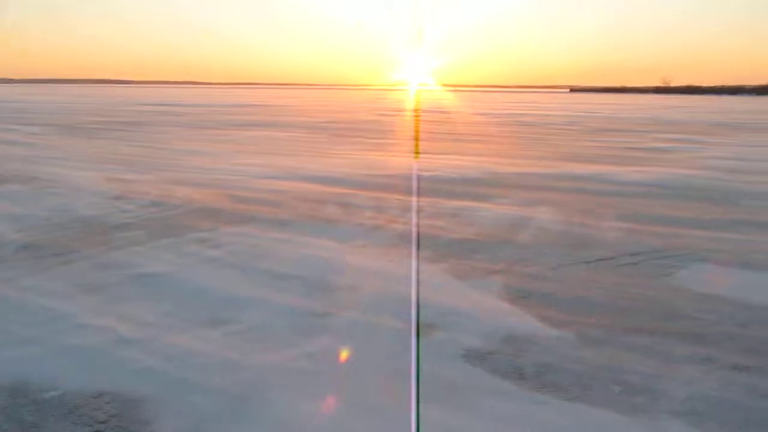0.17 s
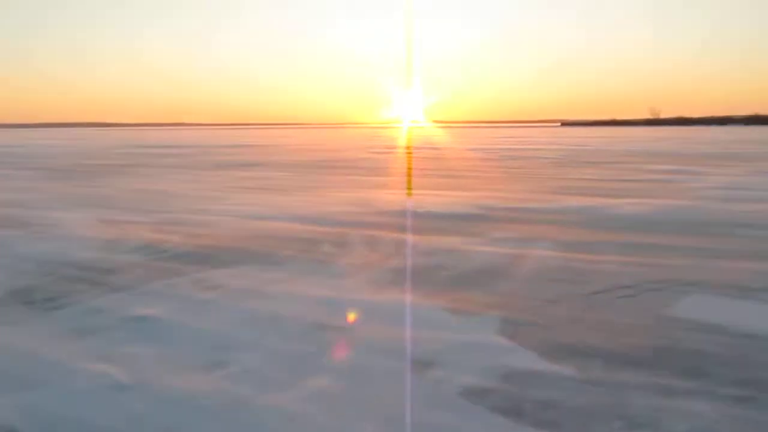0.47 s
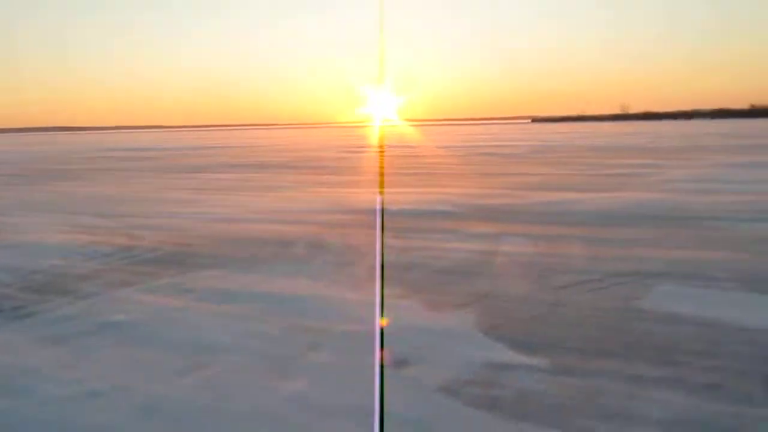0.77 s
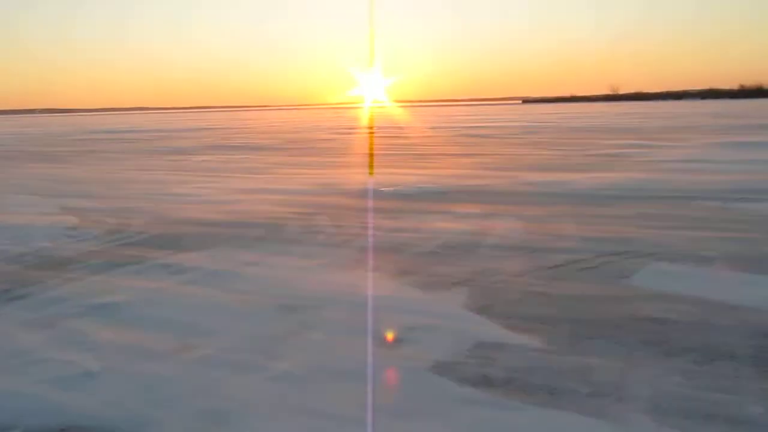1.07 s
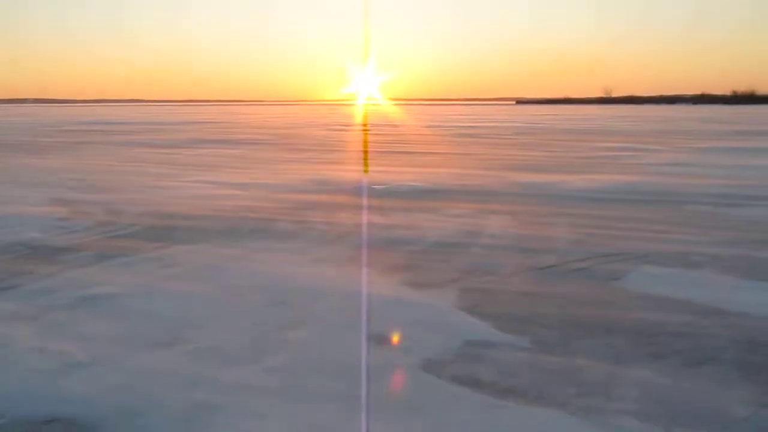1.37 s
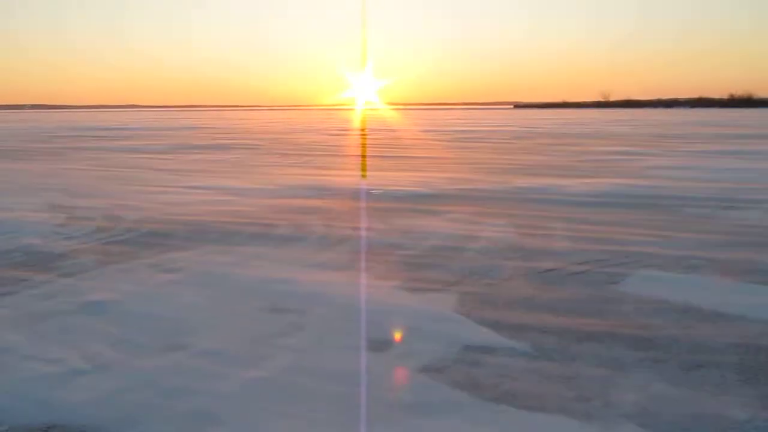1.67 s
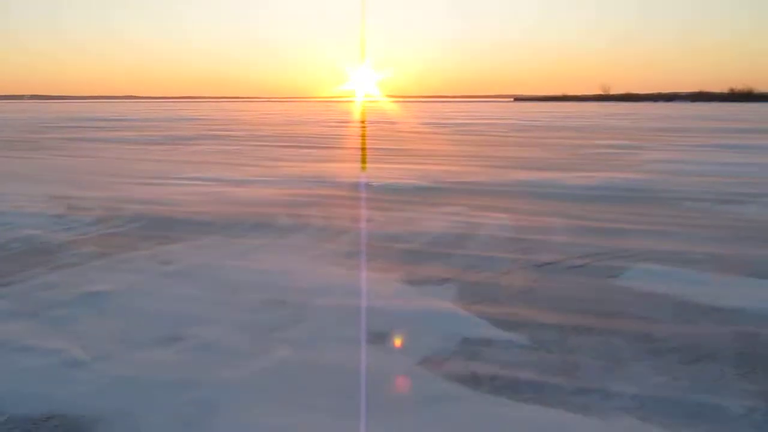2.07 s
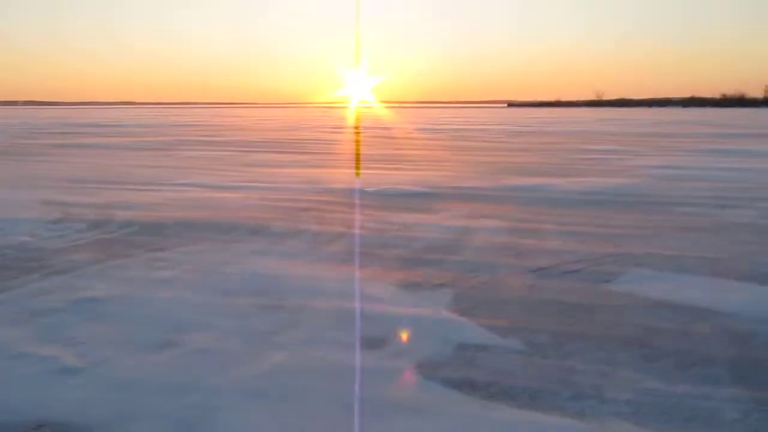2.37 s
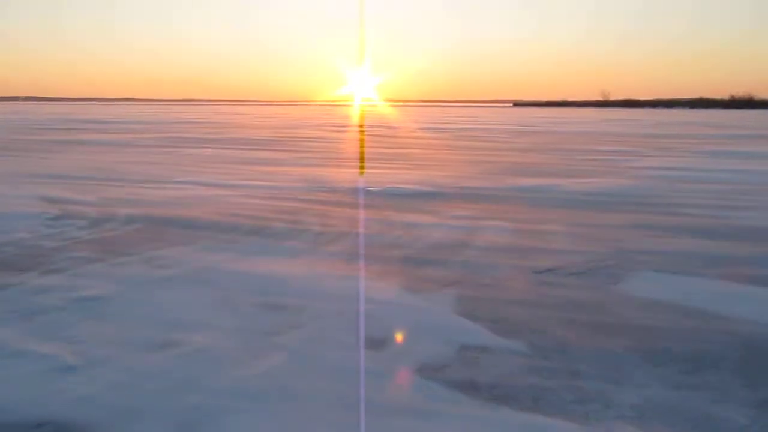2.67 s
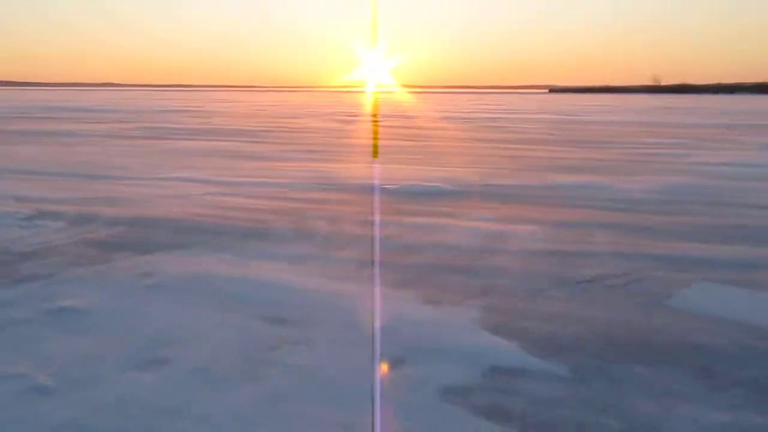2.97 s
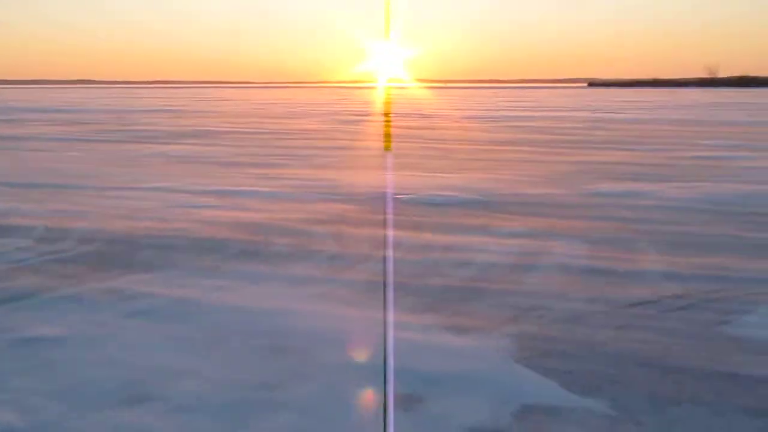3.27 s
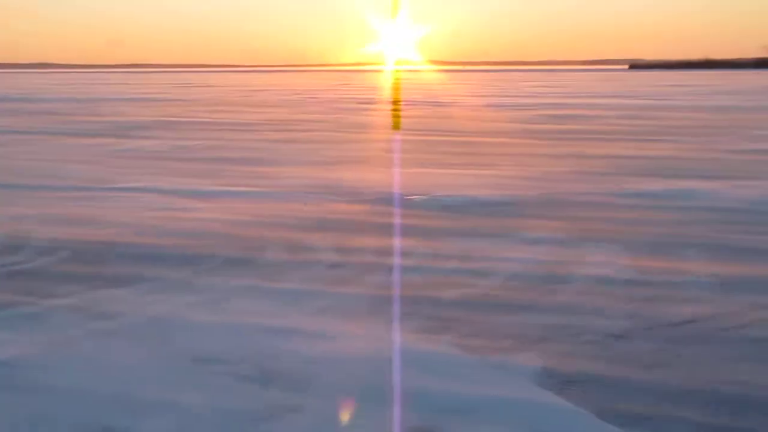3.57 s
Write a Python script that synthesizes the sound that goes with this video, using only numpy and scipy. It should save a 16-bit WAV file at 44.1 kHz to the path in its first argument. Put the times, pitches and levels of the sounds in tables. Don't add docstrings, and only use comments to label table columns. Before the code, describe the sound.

Wind buffeting a small microphone in rough, thudding, distorted gusts over a thin snowy hiss.

```python
import sys
import numpy as np
from scipy import signal
from scipy.fft import rfft, irfft
from scipy.io import wavfile
from scipy.ndimage import uniform_filter1d, minimum_filter1d

SR = 44100
rng = np.random.default_rng(int(sys.argv[2]) if len(sys.argv) > 2 else 0)


def waveform_to_disk(signal):
    frames = np.transpose(np.atleast_2d(signal))
    scaled = np.clip(frames, -1, 1) * 32767
    samples = np.round(scaled).astype(np.int16)
    wavfile.write(sys.argv[1], SR, samples)


def linear_from_db(decibels):
    return 10 ** (np.asarray(decibels, float) / 20)


N = 164493
TIME = np.arange(N) / SR
START_S = .0725

# time_s, level_db, speed_octaves, heave_db
BREEZE = [(0, -36, -0.05, -20), (.3, -28.5, -0.35, -36.5), (.6, -28.5, -0.35, -28.5),
          (.93, -31, -0.65, -34), (.98, -36, 0.07, -48), (1.17, -32, -0.15, -43), (1.45, -27.5, -0.1, -41),
          (1.85, -30.5, -0.15, -35), (2.3, -29.5, -0.05, -44.5), (2.6, -31, -0.25, -39),
          (2.8, -27, 0.25, -51), (3.0, -33, 0.25, -39), (3.2, -29.5, .25, -51), (3.73, -34.5, -0.1, -48)]


def evened(x):
    return x / np.sqrt(np.mean(x ** 2) + 1e-20)


def read(points, hz):
    f, value = np.transpose(points)
    return np.interp(np.log(hz + 1), np.log(f + 1), value)


def curve(table, column=1):
    rows = np.array(table)
    return np.interp(TIME, rows[:, 0], rows[:, column])


def coloured(x, gain):
    return irfft(rfft(x) * gain(np.fft.rfftfreq(len(x), 1 / SR)), len(x))


def lumps(seconds):
    return evened(coloured(rng.standard_normal(N), lambda hz: np.exp(-(hz * seconds) ** 2)))


def snow():
    # time_s, level_db
    drift = [(0, -51), (.14, -51), (.34, -58), (.75, -50.5), (.95, -54), (1.1, -56.5), (1.7, -50),
             (2.2, -54.5), (2.7, -51), (2.85, -54), (3.15, -51), (3.35, -55), (3.73, -54)]
    # freq_hz, level_db
    snow_bed = [(1000, -2), (2500, -1), (4500, -4.5), (7000, -5), (11000, -12), (15500, -17)]
    port_hz, port_width_hz, patch_db = 9050, 1500, 1
    real, imaginary, patches = rng.standard_normal((N // 128 + 6, 257, 3)).T
    hz = np.linspace(0, SR / 2, num=257)
    patches = uniform_filter1d(patches, size=10, axis=0)
    patches = evened(uniform_filter1d(patches, size=20, axis=1))
    port = np.exp(-((hz - port_hz) / port_width_hz) ** 2) + linear_from_db(read(snow_bed, hz))
    spectrum = (real + 1j * imaginary) * port[:, None] * linear_from_db(patch_db * patches)
    hiss = signal.istft(spectrum, nperseg=512, noverlap=384)[1][:N]
    return linear_from_db(curve(drift)) * evened(hiss)


def motor():
    # freq_hz, width_hz, level_db
    modes = [(2900, 200, 0), (3800, 200, -3), (5200, 300, -3), (9580, 300, -2), (12700, 350, -11),
             (14100, 300, -16)]
    # start_s, end_s, level_db
    runs = [
        (2.45, 2.77, -66),
        (2.85, 3.26, -70),
    ]

    def barrel(hz):
        return sum(linear_from_db(db) / (1 + ((hz - f) / width) ** 2) for f, width, db in modes)

    whir = evened(coloured(rng.standard_normal(N), barrel))
    running = np.zeros(N)
    for start, end, db in runs:
        ramp = np.minimum(TIME - start, end - TIME) / .01
        running += linear_from_db(db) * np.clip(ramp, 0, 1)
    return whir * running


def ticks():
    # start_s, level_db, pitch_hz, second_pitch_hz, t60_s
    shell_ticks = [
        (.119, -37, 2850, 7740, .016),
        (0.745, -33, 4750, 9000, 0.005),
        (.891, -48.5, 3980, 2566, 0.014),
    ]
    width_hz = 900
    out, t = np.zeros(N), np.arange(1500) / SR
    for s, db, pitch, second_pitch, t60 in shell_ticks:

        def shell(hz):
            first = 1 / (1 + ((hz - pitch) / width_hz) ** 2)
            return first + 1 / (1 + ((hz - second_pitch) / width_hz) ** 2)

        ring = evened(coloured(rng.standard_normal(1500), shell))
        decay = linear_from_db(db - 60 * np.maximum(t - .0008, 0) / t60)
        attack = np.minimum(t / .0004, 1)
        out[round(s * SR):][:1500] += decay * attack * ring
    return out


def rumble():
    # freq_hz, density_db (per Hz)
    swings = [(12, -17), (28, -2.5), (45, -7.5), (75, -6), (120, -6.5), (220, -12.5), (500, -52.5),
              (2500, -120)]
    heave = evened(coloured(rng.standard_normal(N), lambda hz: linear_from_db(read(swings, hz))))
    return linear_from_db(6 + curve(BREEZE, column=3)) * heave


def airflow():
    # start_s, rush_db, push_db, length_s
    eddies = [(0.1423, -14.2, -23.1, 0.0043), (0.1472, -23.4, -10.9, 0.0084), (0.2057, -18.0, -15.6, 0.0126),
              (0.2186, -22.0, -15.5, 0.0045), (0.2321, -22.0, -11.8, 0.0035), (0.2819, -12.0, -14.0, 0.008),
              (0.3483, -29.0, -19.7, 0.0086), (0.37, -42.4, -20.9, 0.0039), (0.3838, -41.8, -32.0, 0.0053),
              (0.4456, -25.8, -24.0, 0.0059), (0.5736, -26.3, -16.0, 0.008), (0.5891, -27.7, -20.6, 0.0039),
              (0.6013, -35.0, -21.7, 0.0059), (0.6491, -39.5, -27.6, 0.0144), (0.7027, -32.5, -19.0, 0.0078),
              (0.7496, -22.2, -17.2, 0.0037), (0.8333, -18.2, -14.1, 0.0038), (0.8539, -30.3, -10.2, 0.0079),
              (0.9362, -16.2, -6.7, 0.0052), (0.9467, -15.3, -12.5, 0.0091), (0.9984, -34.5, -27.3, 0.0074),
              (1.0308, -27.4, -22.5, 0.0045), (1.047, -9.1, -13.9, 0.0068), (1.0847, -30.6, -21.4, 0.0051),
              (1.115, -28.2, -25.5, 0.004), (1.1233, -31.2, -28.1, 0.0044), (1.1339, -28.9, -23.6, 0.0052),
              (1.2052, -22.9, -16.5, 0.0048), (1.2508, -28.9, -18.6, 0.01), (1.2674, -16.9, -23.1, 0.0041),
              (1.2755, -17.5, -17.0, 0.006), (1.2861, -12.8, -17.2, 0.0039), (1.3453, -27.7, -21.2, 0.0037),
              (1.3561, -32.7, -21.1, 0.0047), (1.3852, -25.0, -21.2, 0.004), (1.3989, -31.2, -15.2, 0.0125),
              (1.4102, -17.7, -24.1, 0.0036), (1.4175, -28.3, -23.6, 0.0052), (1.4376, -35.6, -27.2, 0.0056),
              (1.4585, -29.6, -27.6, 0.004), (1.4934, -30.1, -22.5, 0.0057), (1.5677, -36.5, -26.1, 0.0047),
              (1.6269, -35.2, -20.9, 0.0059),
              (1.6526, -15.6, -9.7, 0.0047), (1.6757, -27.1, -30.7, 0.0083), (1.6981, -18.9, -20.4, 0.0041),
              (1.7339, -24.8, -15.8, 0.0036), (1.7466, -12.2, -8.2, 0.0057), (1.8121, -33.6, -22.2, 0.0049),
              (1.8438, -24.9, -14.3, 0.0059), (1.8635, -14.8, -12.9, 0.0066), (1.8808, -9.8, -6.7, 0.0036),
              (1.8857, -20.3, -15.7, 0.0077), (1.8991, -23.3, -27.4, 0.005), (1.9454, -23.5, -18.0, 0.0043),
              (1.9566, -22.9, -19.6, 0.0052), (1.9966, -16.7, -19.3, 0.0035),
              (2.0464, -31.7, -19.2, 0.0091), (2.0618, -17.4, -27.9, 0.0035),
              (2.0706, -11.8, -16.4, 0.0039), (2.0812, -24.2, -17.3, 0.0057),
              (2.0941, -22.8, -26.2, 0.0036), (2.1088, -27.4, -19.2, 0.0048),
              (2.1239, -35.3, -21.7, 0.0078), (2.1461, -33.4, -26.8, 0.0039),
              (2.1599, -17.7, -28.2, 0.0035), (2.1778, -24.6, -23.0, 0.0035),
              (2.2043, -19.4, -25.8, 0.0046), (2.2206, -14.0, -13.0, 0.0061),
              (2.2434, -41.3, -34.4, 0.0057), (2.3244, -18.8, -17.4, 0.0073), (2.359, -9.5, -10.5, 0.0035),
              (2.3896, -36.1, -29.4, 0.0041), (2.4106, -34.1, -25.1, 0.0081), (2.428, -21.1, -20.0, 0.014),
              (2.4432, -22.1, -15.8, 0.0087), (2.4715, -18.3, -11.8, 0.0084), (2.5011, -32.4, -21.9, 0.005),
              (2.5319, -19.8, -23.7, 0.0084), (2.5516, -16.7, -20.5, 0.0106), (2.6405, -26.3, -24.9, 0.007),
              (2.6738, -19.1, -24.6, 0.004), (2.6817, -16.8, -27.1, 0.0047), (2.7215, -22.4, -21.9, 0.005),
              (2.7321, -19.4, -14.8, 0.0045), (2.7548, -17.8, -13.0, 0.0076),
              (2.7673, -23.1, -14.9, 0.009), (2.7757, -16.2, -13.5, 0.004), (2.7989, -20.3, -30.8, 0.0063),
            (2.8156, -22.7, -27.8, 0.0084), (2.8422, -10.1, -20.6, 0.0053), (2.8522, -12.6, -18.2, 0.0043),
            (2.8802, -24.0, -23.0, 0.0125), (2.8989, -18.4, -16.5, 0.0061), (2.9078, -22.2, -18.6, 0.0073),
            (2.9162, -23.7, -24.2, 0.0109), (2.9549, -40.0, -30.1, 0.0114), (2.9934, -36.1, -28.6, 0.0036),
            (3.0253, -26.3, -17.6, 0.004), (3.0378, -23.0, -19.5, 0.0071), (3.0521, -13.0, -11.9, 0.0035),
            (3.0775, -26.1, -17.1, 0.0072), (3.0964, -13.0, -15.0, 0.0054), (3.1083, -17.2, -21.4, 0.0127),
            (3.1229, -18.8, -18.7, 0.0057), (3.1513, -24.0, -23.3, 0.0092), (3.1937, -18.8, -20.4, 0.0041),
            (3.2074, -13.4, -17.6, 0.0084), (3.2318, -26.4, -26.2, 0.0126), (3.2529, -13.1, -17.0, 0.0038),
            (3.2768, -30.7, -26.0, 0.0071), (3.3049, -26.0, -28.2, 0.0051), (3.3229, -20.0, -21.0, 0.0053),
            (3.3482, -18.5, -12.8, 0.0049), (3.37, -16.4, -14.2, 0.0036), (3.3801, -15.4, -15.9, 0.0064),
            (3.3889, -16.2, -15.7, 0.0086), (3.4172, -24.8, -35.3, 0.0059), (3.4398, -15.8, -26.3, 0.008),
            (3.4654, -26.9, -24.8, 0.0042), (3.4703, -28.1, -29.1, 0.0099), (3.5215, -28.5, -29.3, 0.0062),
            (3.5481, -23.3, -31.9, 0.0049), (3.57, -19.0, -16.1, 0.0045), (3.6133, -41.2, -43.7, 0.0042),
            (3.6373, -21.4, -21.3, 0.0038), (3.6761, -25.1, -17.5, 0.0049), (3.6884, -30.2, -25.0, 0.0057),
            (3.7189, -20.6, -27.8, 0.0066)]
    rise, pointed = .55, 1.5
    rush_mid_db, rush_db_per_octave = -14.5, 10
    power = linear_from_db(curve(BREEZE)) ** 2
    fast = power * curve(BREEZE, column=2)
    for s, rush_db, push_db, length in eddies:
        near = slice(max(round((s - .1) * SR), 0), round((s + .2) * SR))
        u = (TIME[near] - s) / length - rise
        distance = np.where(u < 0, -u / rise, u)
        bump = linear_from_db(push_db) ** 2 * np.exp(-2 * distance ** pointed)
        octaves = (rush_db - push_db - rush_mid_db) / rush_db_per_octave
        power[near] += bump
        fast[near] += bump * octaves
    return np.sqrt(power), fast / power


def buffeting():
    # freq_hz, density_db (per Hz)
    swirl = [(60, 4), (150, -2), (300, 0), (600, -12), (1200, -35), (2400, -56), (5000, -82.5)]
    lump_s, lump_octaves, lump_db = .003, .22, 1.2
    top_octaves = 3.03
    kicks_per_s, kick_spread_db, kick_share = 2500, 3.5, .4
    level, octaves = airflow()
    wobble = 2 * np.tanh(lumps(lump_s) / 2)
    speed = 2 ** (top_octaves * np.tanh((octaves + lump_octaves * wobble) / top_octaves))
    kicks = rng.standard_normal(N) * linear_from_db(kick_spread_db * np.minimum(rng.exponential(1, N), 4))
    kicks = evened(kicks * (rng.random(N) < kicks_per_s / SR))
    steady = rng.standard_normal(N)
    spectrum = rfft(evened(kick_share * kicks + (1 - kick_share) * steady))
    place = 2 * np.log2(np.fft.rfftfreq(N, 1 / SR) / 40 + 1e-9)
    out = np.zeros(N)
    for k in range(16):
        band = irfft(spectrum * np.cos(np.pi / 2 * np.clip(place - k, -1, 1)) ** 2, N)
        out += band * linear_from_db(read(swirl, 40 * 2 ** (k / 2) / speed))
    return linear_from_db(18 + lump_db * wobble) * level * out / np.sqrt(speed)


def slaps():
    # time_s, swing (of full scale), width_s
    suction = [(.2862, -.6, .00018), (.8355, -.5, .0004), (.9419, .72, .0005), (.9514, -1.05, .00035),
               (1.0509, -.4, .00018), (1.289, -.3, .0002), (1.6549, .5, .0004), (1.8829, -.65, .0002),
               (1.998, .25, .0003), (2.0726, -.89, .00025), (2.2237, .82, .0003), (2.3615, -.55, .00014),
               (2.4526, -.45, .0004), (2.7774, .45, .00025), (3.0545, -.5, .0005), (3.2548, .89, .0002),
               (3.3721, -.87, .0002), (3.7297, -.75, .0003)]
    rebound = .39
    out, calm = np.zeros(N), np.ones(N)
    for s, swing, width in suction:
        u = (TIME - s) / width
        out += swing * (np.exp(-u ** 2) - rebound * np.exp(-((u - 3) / 3.1) ** 2))
        calm *= 1 - .9 * np.exp(-(u / 4) ** 2)
    return out, calm


def scene():
    step_s, step_db = .952, -9
    gain = linear_from_db(step_db * (TIME > step_s))
    settle = np.clip(.2 + (TIME - START_S) / .008, 0, 1)
    wind = buffeting() + rumble()
    slap, calm = slaps()
    give = minimum_filter1d(np.minimum(1, .62 / (abs(wind) + 1e-9)), size=201)
    give = uniform_filter1d(uniform_filter1d(give, size=100), size=100)
    mix = settle * calm * give * wind + slap + gain * snow() + motor() + ticks()
    return mix[None]


def roll_off(x):
    return signal.sosfilt(signal.butter(12, 15820, fs=SR, output="sos"), x)


def record(dry):
    ceiling = .709
    held = np.clip(dry, -ceiling, ceiling)
    folded = held - (dry - held)
    return roll_off(folded * (TIME > START_S))


dry = scene()
out = record(dry)
waveform_to_disk(out)
```